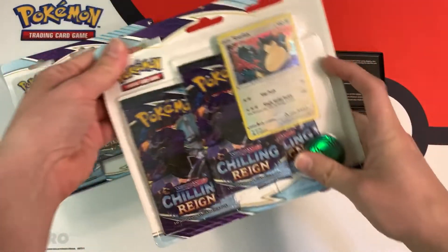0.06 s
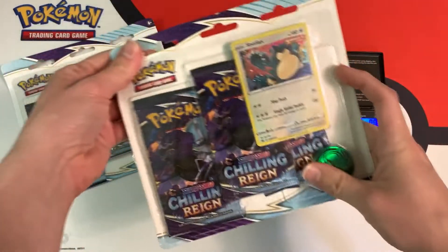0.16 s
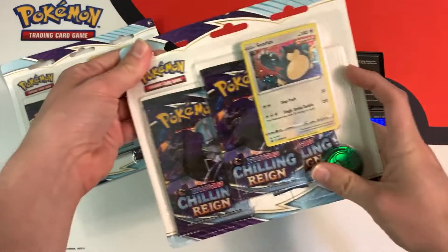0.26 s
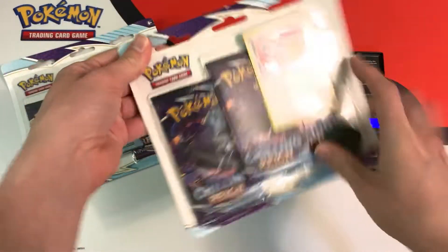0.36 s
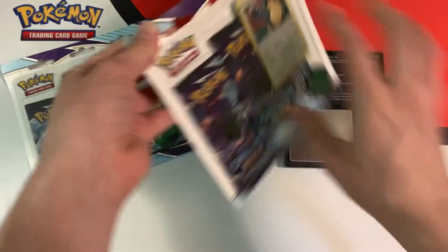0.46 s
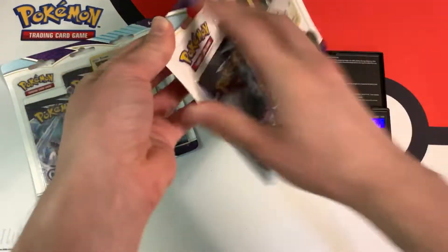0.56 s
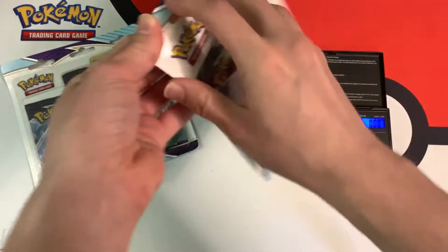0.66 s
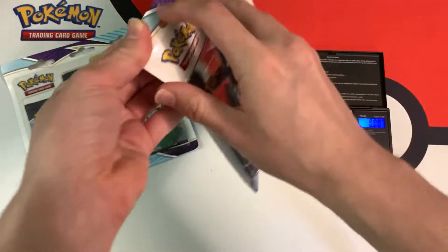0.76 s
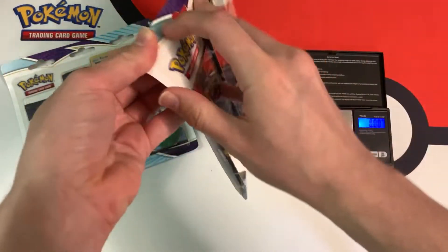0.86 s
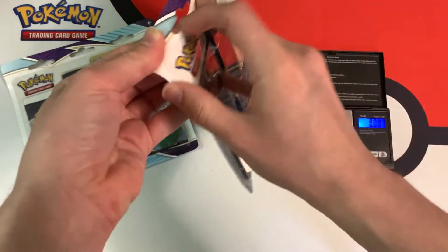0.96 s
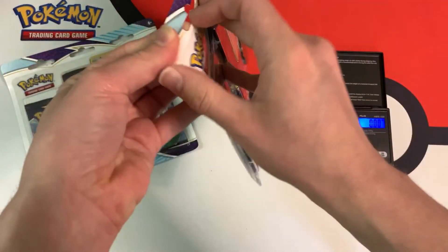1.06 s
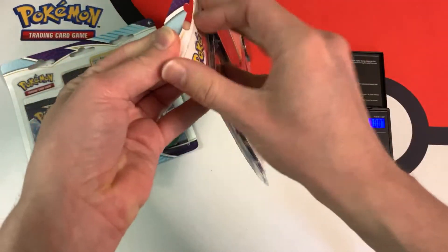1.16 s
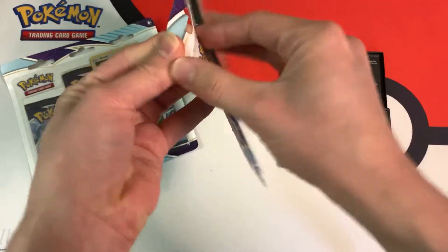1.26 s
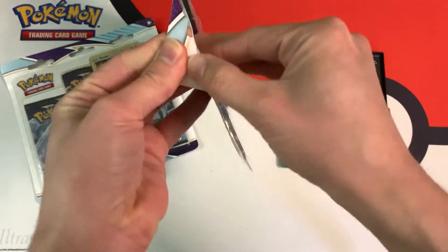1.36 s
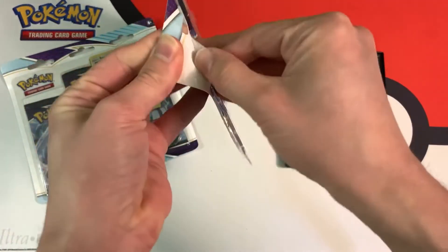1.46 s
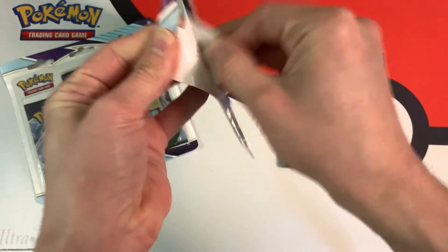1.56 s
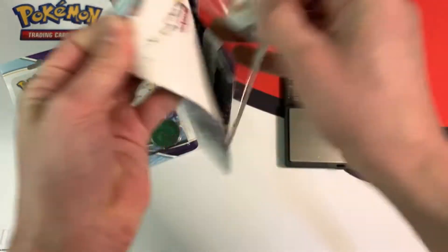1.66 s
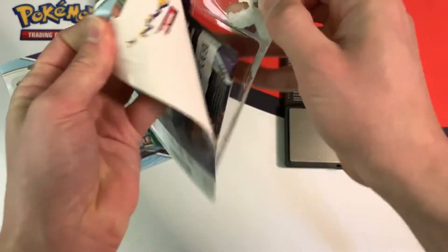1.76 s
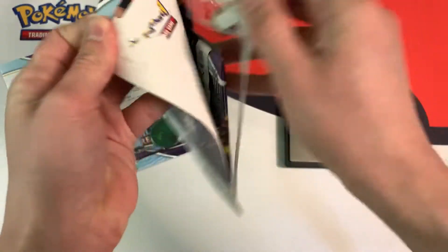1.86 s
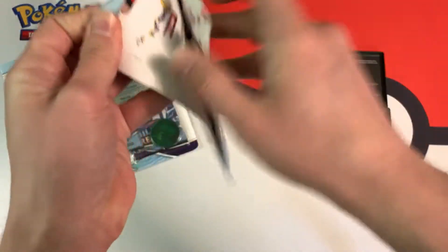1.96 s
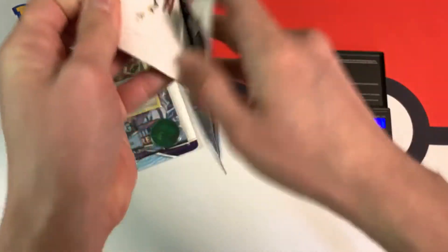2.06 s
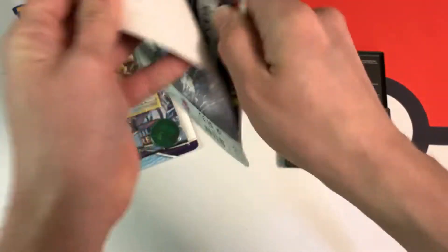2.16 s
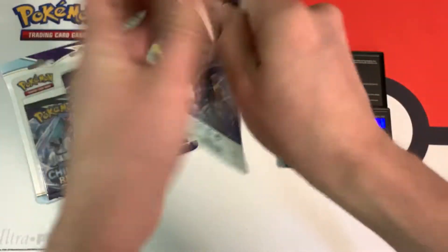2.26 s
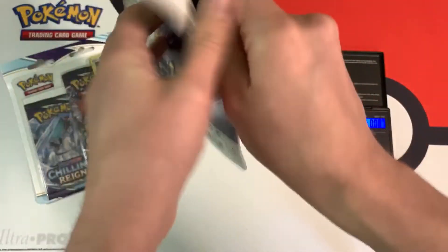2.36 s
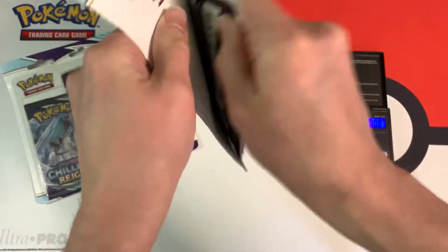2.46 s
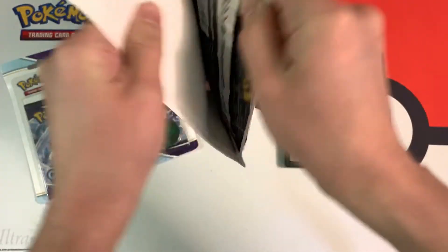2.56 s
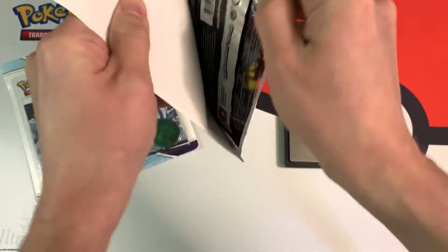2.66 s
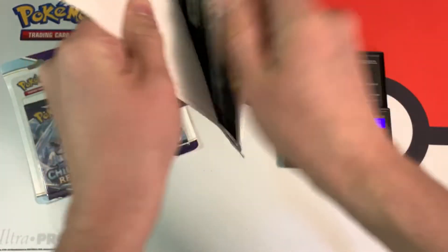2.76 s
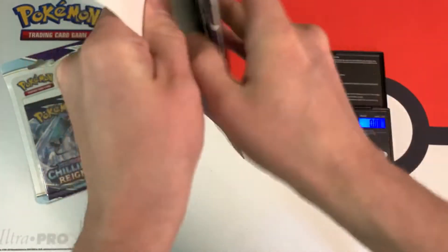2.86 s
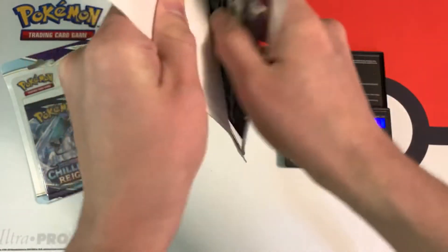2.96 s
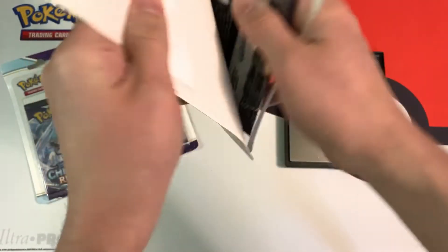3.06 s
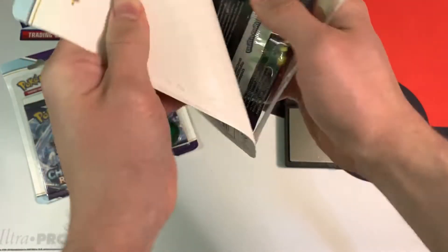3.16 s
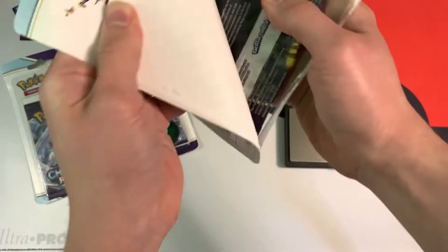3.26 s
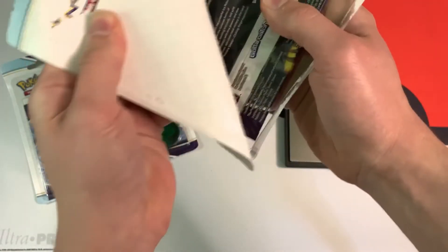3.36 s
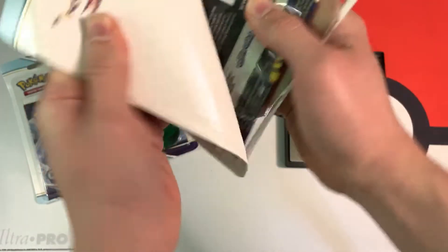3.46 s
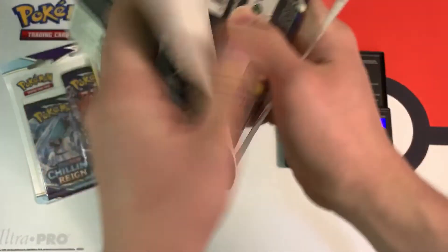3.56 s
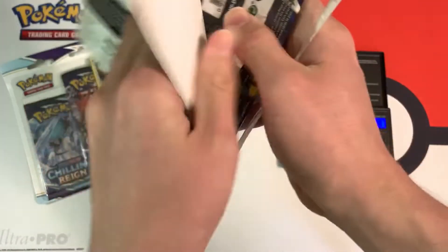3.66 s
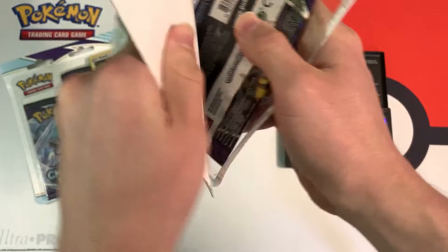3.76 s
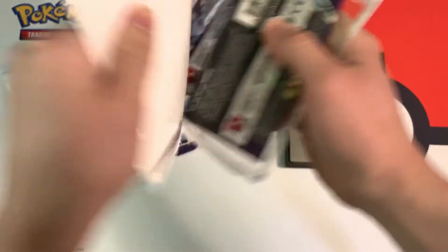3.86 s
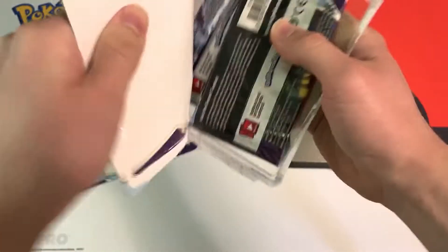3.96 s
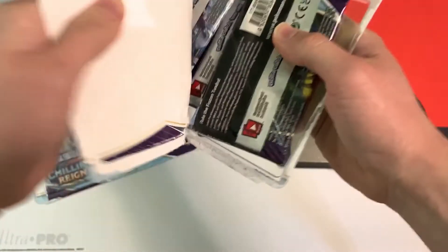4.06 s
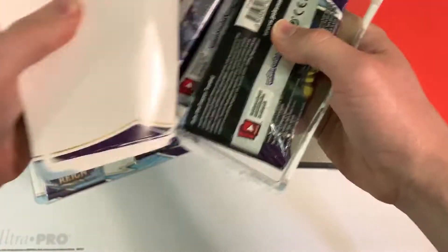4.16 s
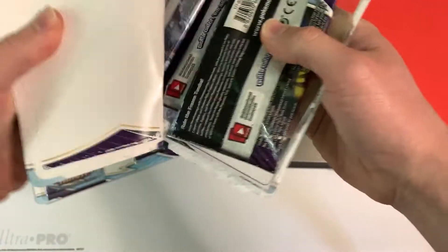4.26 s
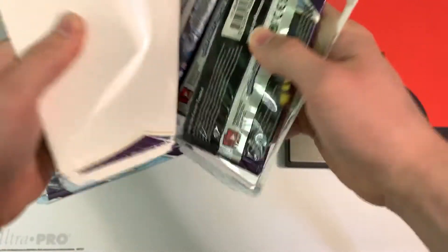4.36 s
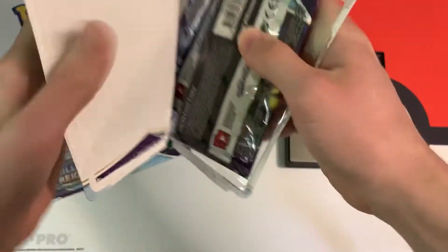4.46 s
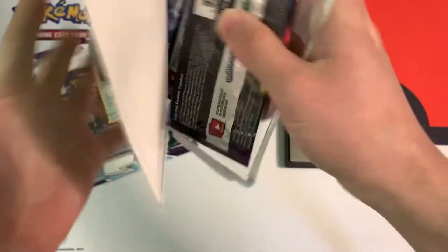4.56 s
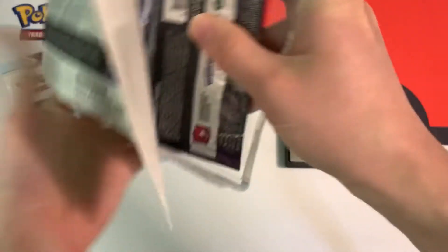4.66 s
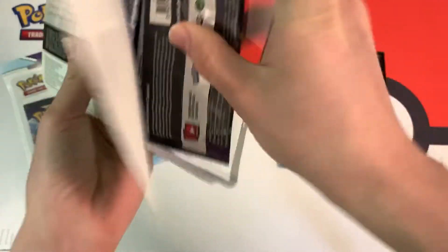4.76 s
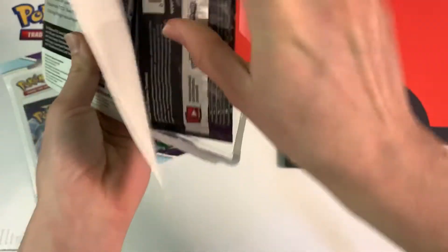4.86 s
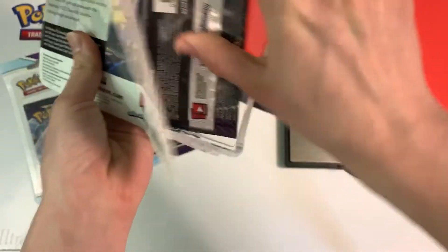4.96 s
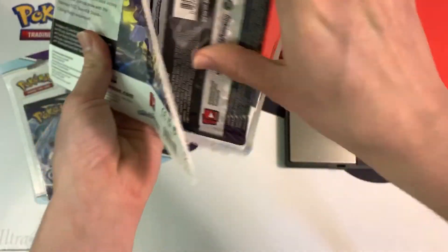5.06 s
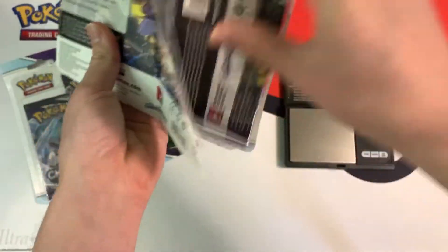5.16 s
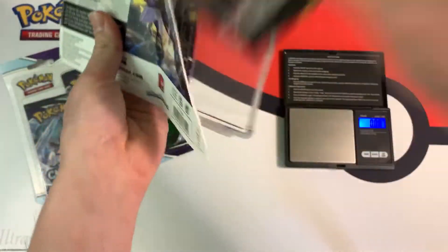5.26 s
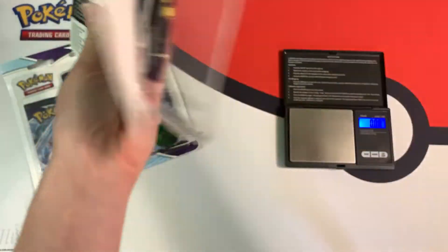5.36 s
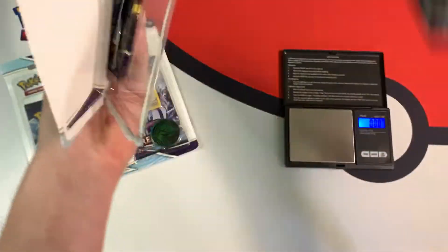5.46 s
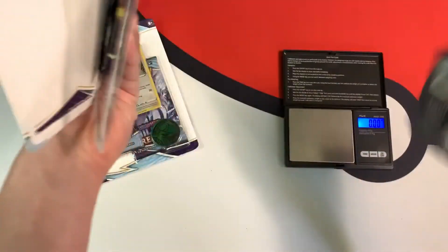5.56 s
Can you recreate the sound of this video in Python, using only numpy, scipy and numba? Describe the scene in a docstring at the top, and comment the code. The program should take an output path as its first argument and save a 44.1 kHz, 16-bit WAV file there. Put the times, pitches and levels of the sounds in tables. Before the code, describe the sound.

A stiff plastic and cardboard pack is pulled apart by hand close to a small microphone. It starts almost quiet with faint rustles and soft ticks, then a loud snap bursts out around 1.6 seconds. From 2.4 seconds crackling rips crowd together, with another hard crack near 3.8 and a smaller burst near 5. Small furnished room, brief reverberation, faint hiss.

```python
"""Two hands bend, tear and pull a card-backed plastic pack apart just below a small microphone.
Faint hiss and a slow heave of stirred air run throughout; the pack first rustles faintly and gives soft snaps.
Around 1.6 s loud snaps of the plastic and dull knocks of the card burst out, then snaps and rips crowd in
from 2.4 s; loud bursts return near 3.8 s and 5.06 s. Resonances ring on short bursts for snaps and on pushes
for knocks, dense tiny clicks make the rips, and a small furnished room rings briefly after them all."""
import sys
import numpy as np
from scipy import signal
from scipy.fft import rfft, irfft
from scipy.io import wavfile
from scipy.ndimage import uniform_filter1d
from numba import njit

SR = 44100
rng = np.random.default_rng(int(sys.argv[2]) if len(sys.argv) > 2 else 0)


def wav_out(sig):
    """Save sig, one row per channel (or a flat mono array), as 16-bit PCM at SR to the path in sys.argv[1]."""
    wavfile.write(sys.argv[1], SR, np.round(np.clip(np.atleast_2d(sig).T, -1, 1) * 32767).astype(np.int16))


N = 246765  # samples

# resonances of the plastic sheet: (centre [Hz], width [Hz], relative gain [dB])
PLASTIC = [(1510, 260, -13.5), (2450, 1000, -12), (3100, 480, -9), (5900, 800, -12.5)]
# bright resonances of the pack: (centre [Hz], width [Hz], relative gain [dB])
TREBLE = [(7900, 7300, 22), (10000, 18000, 1.5), (11300, 820, -52), (13300, 1500, 11)]
# dull modes of the card: (centre [Hz], width [Hz], relative gain [dB])
CARD = [(267, 82, -5), (368.5, 55, 4), (471.3, 30, 4.5), (573, 134, 1), (808, 380, -3.5), (1120, 81, -2.5),
        (1520, 940, -21)]


def undb(db):
    """Turn decibels into an amplitude factor."""
    return 10 ** (np.asarray(db) / 20)


def unit(x):
    """Scale to rms 1."""
    return x / np.sqrt(np.mean(x ** 2))


def ring(x, hz, width):
    """One resonance, gain 1 at the centre."""
    return signal.lfilter(*signal.iirpeak(hz, hz / width, fs=SR), x)


def body(x, modes):
    """Sum of resonances with alternate signs."""
    return sum((-1) ** k * undb(db) * ring(x, hz, width) for k, (hz, width, db) in enumerate(modes))


def curves(table):
    """Columns of a table after its time column, drawn as lines sample by sample."""
    s, *columns = np.transpose(table)
    return [np.interp(np.arange(N) / SR, s, c) for c in columns]


def add(out, s, part, db):
    """Mix a short sound in at s seconds with the given peak level."""
    i = int(s * SR)
    out[i:i + len(part)] += undb(db) * part / np.abs(part).max()


def clicks(rate, spread_db, tail_ms):
    """Random clicks (rate per second), a few far bigger than the rest, each smeared into a short noise burst."""
    struck = rng.random(N) < rate / SR
    size = struck * undb(spread_db * rng.exponential(size=N))
    fade = np.exp(-1000 / (tail_ms * SR))
    envelope = signal.lfilter([1], [1, -fade], size)
    return envelope * rng.standard_normal(N)


def steady(x):
    """Divide out the slow level, so that only the grain is left."""
    window = SR // 15
    slow_power = uniform_filter1d(uniform_filter1d(x ** 2, size=window), size=window)
    return x / np.sqrt(slow_power)


def crumpled(x, modes, hold_ms, patchy_db):
    """The sheet keeps changing shape, so each resonance is fed more or less from one moment to the next."""
    hold = int(hold_ms * SR / 1000)

    def wander():
        """Random levels held in turn, with softened steps."""
        steps = np.repeat(rng.standard_normal(N // 50), hold)[:N]
        return uniform_filter1d(steps, size=hold // 2)

    return sum(body(x * undb(patchy_db * wander()), [mode]) for mode in modes)


@njit
def sweep(x, hz, damp):
    """Band-pass whose centre moves sample by sample; width is damp times the centre."""
    y, band, low = np.empty(len(x)), 0., 0.
    for i in range(len(x)):
        g = np.tan(np.pi * hz[i] / SR)
        v = (band + g * (x[i] - low)) / (1 + g * (g + damp))
        band, low, y[i] = 2 * v - band, low + 2 * g * v, damp * v
    return y


def hiss():
    """Steady room tone and microphone noise: white noise shaped by a spectrum."""
    # spectrum of the hiss: (frequency [Hz], relative level per Hz [dB])
    hiss_spectrum = [(40, -8.5), (100, -15.5), (220, -26.5), (600, -30), (1400, -37.5), (4000, -41.5),
                     (16000, -47)]
    hiss_db = -64.5  # rms
    hz, db = np.transpose(hiss_spectrum)
    f = np.maximum(np.arange(N // 2 + 1) * SR / N, 1)
    gain = undb(np.interp(np.log(f), np.log(hz), db))
    noise = irfft(rfft(rng.standard_normal(N)) * gain, N)
    return undb(hiss_db) * unit(noise)


def air():
    """Moving hands and card stir the air: its pressure on the microphone heaves, mostly below hearing."""
    # slow air pressure on the microphone: (time [s], level [dB])
    air_level = [(0.0, -59), (0.36, -44), (0.54, -38), (1.14, -55), (1.88, -40), (2.31, -47.5), (3.18, -36),
                 (3.93, -47.5), (5.6, -42)]
    heave = rng.standard_normal(N)
    for hz, width in [(5.05, 3.8), (6.44, 12.5), (16.7, 30.0)]:
        heave = ring(heave, hz, width)
    return undb(curves(air_level)[0]) * unit(heave)


def rustle_levels():
    """Plastic, treble and card level in dB and treble pitch in Hz: rips swell and fade over faint handling."""
    # faint rustle of the pack in the fingers, level of the plastic: (time [s], level [dB])
    handling = [(0.0, -66), (0.11, -70), (0.14, -99), (0.26, -101), (0.4, -63.5), (0.7, -67.5),
                (1.2, -65.5), (1.5, -92), (2.05, -84), (2.3, -68), (3.5, -54), (3.67, -71), (4.02, -66),
                (4.6, -65.5), (5.03, -62), (5.4, -64.5), (5.6, -64.5)]
    # separate rips and rustles; swell and fade each span 20 dB: (loudest at [s], swell [ms], fade [ms],
    # plastic level [dB], treble level [dB], treble pitch [Hz], card level [dB])
    rips = [(0.351, 52, 37, -41, -63.5, 1600, -49), (0.955, 18, 160, -84, -60.5, 3900, -88),
            (1.289, 61, 116, -61.5, -49, 10300, -65), (1.411, 97, 65, -85, -41.5, 12800, -92),
            (1.558, 64, 112, -53, -31.5, 8800, -76), (1.628, 60, 65, -28, -36.5, 7000, -34),
            (1.799, 20, 75, -53, -48, 8000, -40), (1.941, 45, 47, -53.5, -63.5, 6200, -59.5),
            (2.172, 116, 255, -50.5, -80, 6000, -56), (2.419, 270, 270, -53, -58, 6200, -58),
            (2.537, 15, 49, -28.5, -32, 6000, -50), (2.601, 16, 21, -29, -42, 6200, -35.5),
            (2.663, 280, 40, -47, -44, 6200, -44), (2.767, 59, 110, -44.5, -57, 9000, -48.5),
            (2.884, 89, 81, -39.5, -81, 7500, -46.5), (3.003, 2.8, 650, -47.5, -45.5, 5900, -53),
            (3.103, 61, 76, -35, -36, 7600, -44), (3.226, 120, 53, -49, -43.5, 5800, -64),
            (3.342, 29, 29, -43, -40, 6000, -50), (3.433, 240, 106, -53.5, -63, 5000, -47.5),
            (3.739, 68, 120, -45.5, -104, 6800, -46.5), (3.823, 26.5, 62.6, -30, -41, 6000, -21),
            (4.209, 204, 61, -70, -91, 1500, -46), (4.329, 54, 130, -72, -53, 8500, -58),
            (4.425, 244, 72, -49, -52, 1600, -56.5), (4.567, 100, 28, -49, -65.5, 7000, -54),
            (4.736, 180, 110, -57, -60, 6000, -51), (4.839, 31, 210, -55, -59, 1500, -56),
            (5.057, 17, 96, -40.5, -50.5, 6000, -40.5), (5.276, 310, 66, -54.5, -45.5, 6000, -54.5),
            (5.528, 23, 56, -45.5, -59, 1200, -52.5)]
    handling_treble_db, handling_card_db = -21.5, -4.5  # against the plastic
    handling_hz = 5900
    step = 64  # samples between points of the level curves
    t = np.arange(0, N, step) / SR
    offsets_db = np.array([[0], [handling_treble_db], [handling_card_db]])
    power = undb(2 * (curves(handling)[0][::step] + offsets_db))
    weighted_pitch = power[1] * np.log(handling_hz)
    for s, swell_ms, fade_ms, plastic_db, treble_db, hz, card_db in rips:
        below_db = 20 * np.where(t < s, (s - t) / swell_ms, (t - s) / fade_ms) * 1000
        peaks_db = np.array([[plastic_db], [treble_db], [card_db]])
        rip = undb(2 * (peaks_db - below_db))
        power = power + rip
        weighted_pitch = weighted_pitch + rip[1] * np.log(hz)
    pitch_hz = np.exp(weighted_pitch / power[1])  # the strongest treble pulls the pitch most
    return [np.interp(np.arange(N) / SR, t, c) for c in (*10 * np.log10(power), pitch_hz)]


def rustle():
    """Fibres and glue part in tiny clicks, denser and more even the harder the pull; the card gets softer shakes."""
    plastic_db, treble_db, card_db, treble_hz = rustle_levels()
    pull = np.clip((np.maximum(plastic_db, treble_db) + 59) / 25, 0, 1)
    fibres = clicks(rate=1200.0 + 2100.0 * pull, spread_db=6.0 - 3.8 * pull, tail_ms=2.28)
    shakes = clicks(rate=240.0, spread_db=3.5, tail_ms=6.1) + 0.083 * fibres
    fizz = unit(fibres) + 0.67 * rng.standard_normal(N)  # film sliding on card adds an even hiss

    treble = unit(crumpled(fizz, TREBLE, hold_ms=16.0, patchy_db=11.5))
    treble += 3.0 * steady(sweep(fizz, treble_hz, 1.0))
    treble += 1.1 * steady(sweep(fizz, treble_hz, 0.1))  # narrow: the ringing crease
    plastic = crumpled(fibres, PLASTIC, hold_ms=45., patchy_db=5.5)
    card = crumpled(shakes, CARD, hold_ms=30., patchy_db=3.5)
    return (undb(plastic_db) * steady(plastic)
            + undb(treble_db) * steady(treble)
            + undb(card_db) * steady(card))


def room(x):
    """Diffuse tail: bands of noise that die at their own rates, after a swell of a ms or two."""
    # decay of the furnished room: (band centre [Hz], time to fall 60 dB [s])
    room_decay = [(300, 0.14), (1200, 0.28), (4000, 0.24), (11000, 0.25)]
    room_db = -11  # energy of the tail against the direct sound
    t = np.arange(SR // 2) / SR
    tail = sum(ring(rng.standard_normal(len(t)), hz, 0.57 * hz) * 1000. ** (-t / t60) for hz, t60 in room_decay)
    tail *= 1 - np.exp(-(t / 0.0013) ** 2)
    tail /= np.sqrt(np.sum(tail ** 2))
    return undb(room_db) * signal.fftconvolve(x, tail)[:N]


def snaps():
    """Each crease lets go in a burst of a ms or two that rings the plastic, most at its own pitch."""
    # single snaps of a crease in the plastic: (time [s], peak level [dB], pitch [Hz], treble peak level [dB])
    creases = [(0.2831, -40, 3980, -73), (0.3043, -38.5, 3430, -53), (0.322, -39, 2300, -55),
               (0.5864, -52, 2500, -41), (0.847, -44.5, 2630, -50), (1.092, -47, 2720, -50),
               (1.159, -53.5, 2400, -52), (1.55, -22, 3120, -36), (1.5936, -19, 3320, -8.5),
               (1.597, -11.5, 3470, -28), (1.622, -5.5, 3410, -17.5), (1.7896, -24.5, 2980, -28),
               (1.7976, -20, 2540, -32), (2.114, -31.5, 2670, -45), (2.1952, -35.5, 2960, -44),
               (2.3928, -26, 2780, -31), (2.4002, -36, 2780, -29), (2.4108, -29, 3620, -34),
               (2.418, -23.5, 6650, -24.5), (2.4243, -30, 6090, -32), (2.449, -17, 3420, -30.5),
               (2.4937, -27.5, 3160, -24), (2.5124, -22.5, 2570, -19.5), (2.531, -29, 2900, -25),
               (2.5408, -17, 2550, -24), (2.5546, -35, 5950, -36), (2.6054, -17.5, 5600, -23.5),
               (2.65, -26, 5960, -42), (2.726, -34.5, 4650, -42), (2.739, -30, 5850, -38),
               (2.7914, -28, 5800, -27.5), (2.8013, -36, 3570, -40), (2.8498, -25.5, 3050, -46),
               (2.9533, -29, 2650, -33.5), (3.017, -33, 3460, -45), (3.0952, -19, 2820, -46),
               (3.1628, -28, 6640, -31), (3.2738, -30.5, 5100, -29), (3.2977, -29, 5600, -44),
               (3.305, -30.5, 2680, -52), (3.3384, -22.5, 3300, -47), (3.3433, -31, 3050, -27),
               (3.3805, -26.5, 5860, -35), (3.443, -42, 8700, -43), (3.4602, -28.5, 2560, -36),
               (3.4939, -29.5, 2460, -38), (3.7518, -34, 5930, -29.5), (3.768, -36, 6400, -31),
               (3.788, -41, 5790, -27), (3.7995, -49, 6000, -17), (3.8032, -10, 2320, -25),
               (3.82, -12.5, 2800, -9.5), (3.835, -17, 4360, -15), (4.2, -35, 2900, -64),
               (4.213, -36, 2950, -59), (4.2877, -45, 2340, -41), (4.3202, -30, 5160, -40),
               (4.3263, -25.5, 3260, -20.5), (4.3777, -30, 2870, -52), (4.4323, -26, 3230, -53),
               (4.506, -33, 3480, -34), (4.519, -45, 6600, -43), (4.546, -39, 5350, -29),
               (4.689, -39.5, 2760, -32.5), (4.7545, -53, 6000, -24), (4.8367, -28, 2750, -39),
               (4.919, -34.5, 1940, -59), (4.9367, -31, 6000, -50), (4.96, -33, 2630, -63),
               (5.043, -29, 2590, -45), (5.0478, -22.5, 6320, -56), (5.0574, -20, 3550, -34),
               (5.061, -14, 3620, -25), (5.092, -19, 3820, -18.5), (5.103, -23.5, 6350, -35),
               (5.281, -46, 5540, -21.5), (5.2934, -31.5, 5540, -43), (5.513, -28, 2530, -69)]
    out, t = np.zeros(N + SR), np.arange(SR // 40) / SR
    for s, db, hz, treble_db in creases:
        x = t / (0.0006 * np.exp(0.33 * rng.standard_normal()))  # time against a varied burst length
        burst = rng.standard_normal(len(t)) * x * np.exp(-x)
        add(out, s, ring(burst, hz, 0.14 * hz) + body(burst, PLASTIC), db)
        add(out, s, body(burst, TREBLE), treble_db)
    return out[:N]


def knocks():
    """A push of half a cycle, a little rough, rings the card, most at its own pitch, and thuds behind it."""
    # dull knocks of the card as it buckles or is gripped:
    # (time [s], peak level [dB], pitch [Hz], thud peak level [dB])
    buckles = [(0.5414, -47, 350, -55), (0.8333, -44.5, 212, -48), (1.177, -51.5, 188, -54),
               (1.282, -47.5, 203, -49.5), (1.593, -17, 584, -62), (1.6208, -17, 806, -45),
               (1.639, -26, 970, -66), (1.7978, -21.5, 455, -76), (2.105, -45.5, 584, -48),
               (2.1783, -41.5, 366, -51), (2.5434, -28, 960, -39), (2.6018, -21.5, 1130, -36),
               (2.8489, -30.5, 530, -47), (3.0986, -31.5, 500, -48), (3.3137, -29.5, 1030, -64),
               (3.4034, -31, 394, -61), (3.576, -47, 200, -45.5), (3.742, -33.5, 415, -70),
               (3.8028, -8.5, 620, -53), (3.829, -26, 310, -39), (3.9521, -29.5, 330, -41.5),
               (4.085, -41.5, 660, -56), (4.1, -36, 593, -56), (4.127, -41, 655, -59),
               (4.163, -63, 606, -58), (4.1999, -39, 800, -64), (4.2134, -38, 750, -62),
               (4.3773, -40.5, 335, -45.5), (4.507, -47.5, 203, -43), (4.8356, -36.5, 1160, -52),
               (5.0581, -22, 485, -38), (5.064, -29, 212, -52), (5.5127, -33, 1170, -60),
               (5.5281, -30.5, 1120, -46)]
    # the hand and table behind the card: (centre [Hz], width [Hz])
    thud_mode = (83, 157)
    out, t = np.zeros(N + SR), np.arange(SR // 10) / SR
    for s, db, hz, thud_db in buckles:
        roughness = 1 + 0.13 * rng.standard_normal(len(t))
        push = np.sin(np.pi * np.minimum(2 * hz * t, 1)) * roughness
        card = ring(push, hz, 0.18 * hz) + 0.36 * body(push, CARD)
        add(out, s, np.diff(card, prepend=0), db)  # a small sheet radiates little bass
        tick = rng.standard_normal(len(t)) * np.exp(-t / 0.0011)
        add(out, s, body(tick, PLASTIC + TREBLE[:1]), db - 7)  # the plastic ticks along
        add(out, s, ring(ring(push, *thud_mode), *thud_mode), thud_db)
    return out[:N]


def scene():
    """The pack and its room, over hiss and stirred air."""
    pack = snaps() + knocks() + rustle()
    return (pack + room(pack) + hiss() + air())[None]


def record(dry):
    """The recorder rounds the loudest peaks and cuts the top."""
    top_hz = 15900
    rounded = np.tanh(1.238 * dry) / 1.362
    low_pass = signal.ellip(10, .2, 70, top_hz, fs=SR, output="sos")
    return signal.sosfilt(low_pass, rounded)


dry = scene()
out = record(dry)
wav_out(out)
```